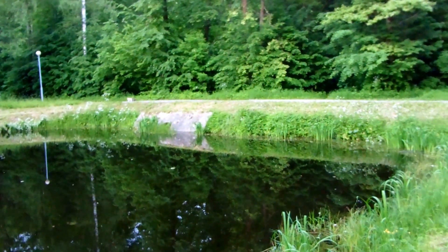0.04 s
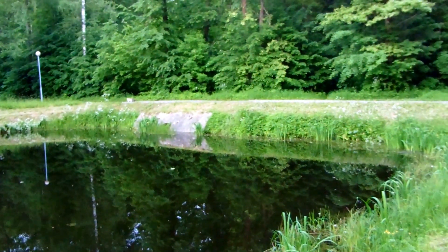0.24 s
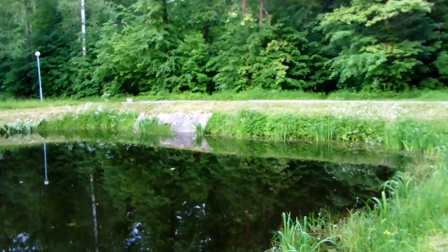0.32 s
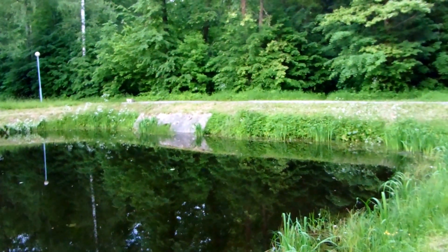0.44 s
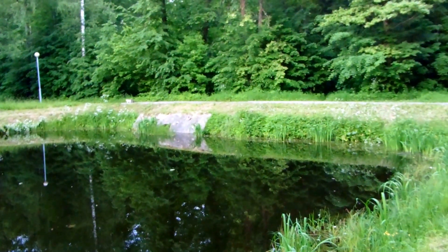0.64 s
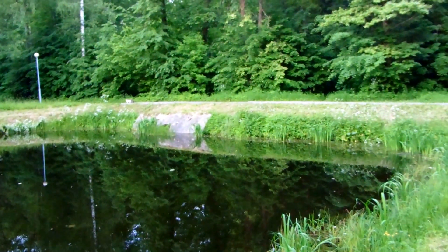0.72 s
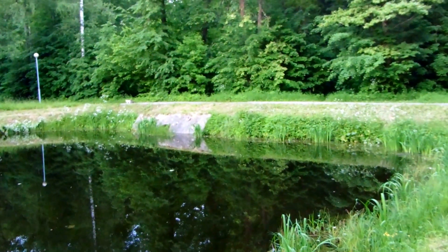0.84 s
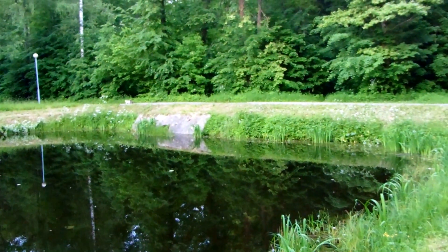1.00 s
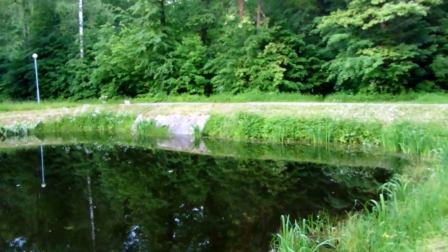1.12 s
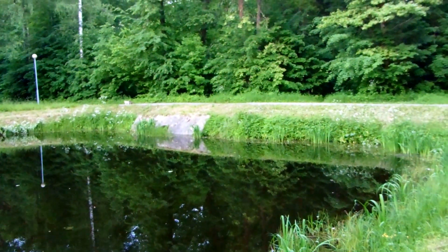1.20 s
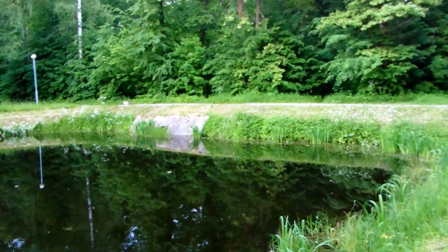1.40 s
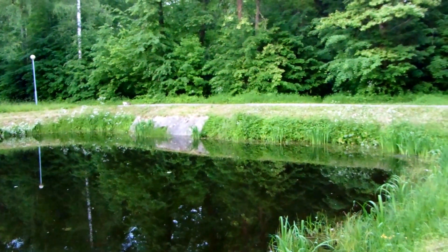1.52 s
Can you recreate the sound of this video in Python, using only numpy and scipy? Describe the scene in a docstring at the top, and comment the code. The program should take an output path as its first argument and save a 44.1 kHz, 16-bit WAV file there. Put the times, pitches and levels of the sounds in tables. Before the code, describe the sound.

Two frogs croak in a quick run of short, overlapping notes that echo around a tree-lined pond. Near the end comes a low grunt rising in pitch, while a small bird twitters far off over a faint hiss.

```python
"""Over a faint hiss, two water frogs croak in quick, overlapping notes at a pond ringed by trees.
Each note is a slowing train of pulses that rings the vocal sac and the throat;
the bank and the forest throw the calls back. Near the end a small bird twitters far off,
and a slow, low grunt rises in pitch as single pulses ring a tightening sac."""
import sys
import numpy as np
from scipy import signal
from scipy.io import wavfile

SR = 44100
rng = np.random.default_rng(int(sys.argv[2]) if len(sys.argv) > 2 else 0)


def master(y):
    """Save y as 16-bit WAV."""
    cut = np.clip(np.atleast_2d(y).T, -1, 1)
    pcm = np.round(cut * 32767)  # scale
    wavfile.write(sys.argv[1], SR, pcm.astype(np.int16))


N = 68355


def amp(db):
    """Decibels to gain."""
    return 10 ** (np.asarray(db) / 20)


def unit_rms(x):
    return x / np.sqrt(np.mean(x ** 2) + 1e-20)


def add(mix, start_s, sound):
    part = mix[max(round(start_s * SR), 0):][:len(sound)]
    part += sound[:len(part)]


def curve(rows, column=1):
    """One column of a timed table, at every sample."""
    rows = np.array(rows)
    return np.interp(np.arange(N) / SR, rows[:, 0], rows[:, column])


def colour(x, response):
    """Minimum-phase filter from rows of freq_hz, gain_db."""
    size = 4096
    freq_hz, gain_db = np.transpose(response)
    bin_hz = abs(np.fft.fftfreq(size, 1 / SR))
    log_gain = np.log(amp(np.interp(np.log(bin_hz + 1), np.log(freq_hz), gain_db)))
    spectrum = np.exp(np.conj(signal.hilbert(log_gain)))
    taps = np.fft.ifft(spectrum).real[:size // 2]
    return signal.fftconvolve(x, taps)[:len(x)]


def ring(age_s, hz, width_hz):
    """A resonance struck at age 0."""
    age_s = np.maximum(age_s, 0)
    return np.exp(-np.pi * width_hz * age_s) * np.sin(2 * np.pi * hz * age_s)


def noise_band(hz, width_hz):
    """Narrow noise around a fixed or moving pitch."""
    lowpass = signal.butter(2, width_hz / 2, fs=SR, output="sos")
    envelope = signal.sosfilt(lowpass, rng.standard_normal(N) + 1j * rng.standard_normal(N))
    carrier = np.exp(2j * np.pi * np.cumsum(hz * np.ones(N)) / SR)
    return unit_rms((envelope * carrier).real)


def pulse_positions(count, rate_ratio):
    """Positions, 0-1, in a train that slows to rate_ratio of its starting rate."""
    grid = np.linspace(0, 1, SR // 20)
    cycles = np.cumsum(1 + (rate_ratio - 1) * grid ** 1.4)
    return np.interp(np.linspace(0, cycles[-1], count), cycles, grid)


def swing(age_s, cycles, width_hz):
    """Steady oscillation that successive pulses keep up in phase."""
    age_s = np.maximum(age_s, 0)
    rise = 1 - np.exp(-age_s / 0.000667)
    return rise * np.exp(-np.pi * width_hz * age_s) * np.sin(2 * np.pi * cycles)


def croak(length_s, pulse_count, rate_ratio, level_db, crest_frac, last_pulse_db,
          sac_start_hz, sac_end_hz, sac_width_hz, throat_hz, throat_db, throat_rise_db,
          low_hz, low_db, high_hz, high_db, sizzle_hz, sizzle_db):
    """Slowing pulses swell and fade; each rings the sac, the throat, the body and three overtones."""
    position = pulse_positions(pulse_count, rate_ratio)[:, None]  # one row per pulse
    t = np.arange(0, length_s + 0.02, 1 / SR)
    age_s = t - position * length_s
    scatter = rng.standard_normal((pulse_count, 5)).T[:, :, None]
    sac_detune, throat_detune, overtone_detune, sizzle_detune = 1 + 0.008 * scatter[1:]

    swell_db = -14 * (1 - position / crest_frac) ** 2
    fade_db = last_pulse_db * ((position - crest_frac) / (1 - crest_frac)) ** 2
    effort = amp(np.where(position < crest_frac, swell_db, fade_db) + 0.7 * scatter[0])

    sac_hz = sac_start_hz + (sac_end_hz - sac_start_hz) * position
    sac_cycles = np.cumsum(np.interp(t, [0, length_s], [sac_start_hz, sac_end_hz])) / SR
    sac = amp(-2.5) * ring(age_s, sac_hz * sac_detune, sac_width_hz)
    sac += amp(-5.5) * swing(age_s, sac_cycles, 0.6 * sac_width_hz)

    throat = ring(age_s, throat_hz * throat_detune, width_hz=125)
    throat += amp(-8.5) * swing(age_s, throat_hz * t, width_hz=125)
    throat *= amp(throat_db + throat_rise_db * (position - 0.5))

    pause = np.gradient(position, axis=0)
    body_db = -29.5 + 6 * np.log2(pause / np.median(pause))  # longer pause, harder thump
    body = amp(body_db) * ring(age_s, hz=1000, width_hz=220)
    snap = -amp(-7.5) * ring(age_s, hz=2685, width_hz=2625)  # pulse edge
    low = amp(low_db) * ring(age_s, low_hz * overtone_detune, width_hz=229)
    high = amp(high_db) * ring(age_s, high_hz * overtone_detune, width_hz=229)
    sizzle = amp(sizzle_db) * ring(age_s, sizzle_hz * sizzle_detune, width_hz=502)
    pulses = effort * (sac - throat + body + snap + low + high + sizzle)
    return amp(level_db) * pulses.sum(0)


# Frog notes: start_s, length_s, pulse_count, rate_ratio, level_db, crest_frac, last_pulse_db,
# sac_start_hz, sac_end_hz, sac_width_hz, throat_hz, throat_db, throat_rise_db,
# low_hz, low_db, high_hz, high_db, sizzle_hz, sizzle_db
FROG_NOTES = [ (0.1884, 0.0382, 13, 0.491, -18.5, 0.42, -5.5, 1814, 1655, 194.4, 3824, -17, 0.5, 7300, -28, 8940, -27, 13200, -43),
              (0.27, 0.03817, 13, 0.496, -14.5, 0.63, -10.5, 1800, 1725, 161.6, 3813, -14.5, -13, 7160, -22.5, 9190, -28, 13200, -41.5),
              (0.367, 0.0375, 13, 0.487, -13.5, 0.71, -16, 1875, 1786, 159.3, 3815, -12.5, -7.5, 7340, -23, 9020, -28, 13200, -38),
              (0.464, 0.03545, 12, 0.5, -13, 0.47, -10, 1918, 1872, 148, 3756, -12, -7, 7400, -25.5, 8960, -24.5, 13150, -24.5),
              (0.529, 0.031, 12, 0.559, -18, 0.48, 4.5, 1902, 1967, 212, 4140, -24, 3, 7470, -22.5, 8780, -29, 13200, -40.5),
              (0.557, 0.0355, 12, 0.486, -12.5, 0.64, -7, 1904, 1837, 144.5, 3766, -11.5, 1.5, 7210, -26, 9054, -26.5, 12830, -22.5),
              (0.6137, 0.0353, 13, 0.436, -14.5, 0.36, -1.5, 1986, 2044, 238, 4060, -19.5, -13, 7505, -24, 8940, -30, 13200, -34.5),
              (0.653, 0.0325, 11, 0.43, -11.5, 0.52, -10.5, 1905, 1883, 169, 3732, -9.5, -6.5, 7230, -29, 9170, -27.5, 12220, -21),
              (0.713, 0.0343, 13, 0.521, -13, 0.64, -12, 2211, 2215, 287, 4045, -15, -12.5, 6363, -15, 8374, -21.5, 12560, -26.5),
              (0.744, 0.0325, 11, 0.42, -11.5, 0.55, -9, 1886, 1814, 156, 3680, -10, -4.5, 7580, -26, 8955, -29.5, 12130, -18.5),
              (0.8163, 0.0308, 12, 0.5445, -12.5, 0.44, 1, 2417, 2223, 303, 3838, -14, 2.5, 6226, -15, 7980, -23, 12100, -24),
              (0.8343, 0.0325, 11, 0.52, -12, 0.44, -4, 1845, 1729, 175.3, 3690, -13.5, -3, 5880, -23, 9010, -32, 13180, -22.5),
              (0.92, 0.03575, 14, 0.51, -15, 0.09, 5, 2106, 1986, 297, 3780, -15, -16.5, 6550, -22.5, 8850, -30.5, 14260, -25),
              (0.9234, 0.054, 16, 0.24, -17.5, 0.11, -1, 1391, 1470, 151.8, 3670, -15, 0.5, 7260, -26.5, 9100, -49.5, 11680, -25),
              (1.023, 0.0385, 13, 0.438, -12, 0.52, -3, 2069, 2043, 251.6, 3700, -20.5, -21.5, 7570, -28.5, 8887, -34.5, 13400, -27.5),
              (1.1243, 0.03954, 14, 0.47, -15, 0.39, 0.5, 2056, 1824, 233.5, 3760, -17.5, -20, 7350, -32, 9150, -33.5, 12610, -22.5),
              (1.224, 0.05466, 14, 0.1176, -16.5, 0.29, -0.5, 1697, 1550, 173.5, 3720, -28.5, -47.5, 7410, -30, 8920, -39, 12900, -40)]


def frogs():
    """The overlapping croaks of both frogs."""
    out = np.zeros(N)
    for start_s, *shape in FROG_NOTES:
        add(out, start_s, croak(*shape))
    return out


# Sac pulses: start_s, level_db, pitch_hz, width_hz
GRUNT_PULSES = [(1.3650, -27, 537, 206), (1.3740, -34, 588, 202), (1.3951, -26, 758, 214.6),
                (1.4000, -29, 777, 211.4), (1.4221, -27.5, 900, 92.5), (1.43, -31, 931.8, 78.5),
                (1.4470, -30, 926, 84.5), (1.4608, -28.5, 943, 80.6), (1.473, -28.5, 982, 83),
                (1.4972, -26.5, 1005, 110.6), (1.511, -27.5, 1039, 121.5), (1.5369, -25.5, 1162, 151)]
# Murmur envelope: time_s, level_db
MURMUR_LEVELS = [(1.15, -82), (1.24, -49.5), (1.3, -45.5), (1.36, -50), (1.42, -51.5), (1.55, -50)]


def grunt():
    """Slow, rounded pulses ring a sac that tightens and rises in pitch, over a low murmur."""
    out = amp(curve(MURMUR_LEVELS)) * noise_band(hz=524.84, width_hz=260)
    age_s = np.arange(SR // 20) / SR
    rise = np.minimum(age_s / 0.00038, 1)
    body = amp(-1.5) * ring(age_s, hz=490, width_hz=1950)
    for start_s, level_db, pitch_hz, width_hz in GRUNT_PULSES:
        sac = ring(age_s, pitch_hz, width_hz)
        add(out, start_s, -amp(level_db) * rise * (sac + body))
    return out


def echo_tail(x, t60_s, build_s, echoes_per_s=2000):
    """Scattered echoes that build up and die away."""
    t = np.arange(N) / SR
    echoes = rng.standard_normal(N) * (rng.random(N) < echoes_per_s / SR)
    taps = echoes * amp(-60 * t / t60_s) * (1 - np.exp(-t / build_s))
    return signal.fftconvolve(x, taps / np.linalg.norm(taps))[:N]


# Near reflections: delay_s, gain_db
NEAR_ECHOES = [(.0011, -28.5), (.0046, -44.5), (.0083, -42.5)]
# Bank echo response: freq_hz, gain_db
BANK_EQ = [(300, -26), (1800, -19.5), (3300, -8.5), (3850, -1), (4300, -7), (16000, -4.5)]
# Shore tail response: freq_hz, gain_db
SHORE_EQ = [(300, -0.5), (1100, -4), (1800, 3.5), (2800, 10.5), (3800, 10), (6000, -4), (16000, 18.5)]
# Forest tail response: freq_hz, gain_db
FOREST_EQ = [(200, 2.5), (500, -5.5), (1100, -1.5), (1700, -4), (2300, 1.5), (3000, -4), (3800, 2.5),
             (6000, 2.5), (16000, -18.5)]


def pond(calls):
    """Direct sound, near reflections, a bright echo off the bank, and tails from shore and forest."""
    early = calls.copy()
    for delay_s, gain_db in NEAR_ECHOES:
        add(early, delay_s, amp(gain_db) * calls)
    bank = amp(-4) * colour(calls, BANK_EQ)
    add(early, start_s=0.022, sound=bank)
    shore = colour(echo_tail(calls, t60_s=0.086, build_s=0.000765), SHORE_EQ)
    forest = colour(echo_tail(calls, t60_s=1.47, build_s=0.047), FOREST_EQ)
    return early + amp(-11) * shore + amp(-10) * forest


# Twitter contour: time_s, level_db, pitch_hz
BIRD_CONTOUR = [(1.28, -66.5, 5040), (1.33, -51.5, 5250), (1.37, -49.5, 5250), (1.41, -52.5, 5000),
                (1.46, -48, 5050), (1.49, -49.5, 4900), (1.55, -53, 5100)]


def bird():
    """A far twitter, blurred by the trees into a fluttering band of noise."""
    flutter_db = 2.5 * np.tanh(noise_band(hz=31.58, width_hz=31.58))
    voice = noise_band(curve(BIRD_CONTOUR, column=2), width_hz=764)
    return amp(curve(BIRD_CONTOUR) + flutter_db) * voice


# Hiss spectrum: freq_hz, relative_db
HISS_SPECTRUM = [(15, -54), (25, -28), (86, -16), (144, -15), (289, -7), (378, -1), (445, -4), (600, -2.5),
                 (741, -4.5), (1500, -5), (4150, -8), (5010, -10.5), (6050, -10), (15500, -10)]


def hiss():
    """Faint, steady broadband noise."""
    return amp(-48) * unit_rms(colour(rng.standard_normal(N), HISS_SPECTRUM))


# Microphone response: freq_hz, gain_db
MICROPHONE_EQ = [(30, -30.5), (150, -38.5), (260, -37), (350, -3), (500, 0.5), (700, -2), (1000, 3),
                 (1150, -1), (1450, 2.5), (2000, 1), (3000, 4), (4000, 0.5), (4700, -1.5), (6000, -10.5),
                 (9000, 2.5), (16000, -9)]


def microphone(x, rumble_cut_hz=62):
    """Uneven response with a rumble cut."""
    highpass = signal.butter(2, rumble_cut_hz, "highpass", fs=SR, output="sos")
    return signal.sosfilt(highpass, colour(x, MICROPHONE_EQ))


def scene():
    """Echoing croaks, a dry grunt, the bird and the hiss, in mono."""
    calls = microphone(pond(frogs()) + grunt())
    return (calls + bird() + hiss())[None]


def record(dry):
    """Steep treble band limit."""
    cutoff_hz = 15750
    lowpass = signal.firwin(801, cutoff_hz, window=("kaiser", 9), fs=SR)
    return signal.oaconvolve(dry, lowpass[None], "same")


dry = scene()
out = record(dry)
master(out)
```